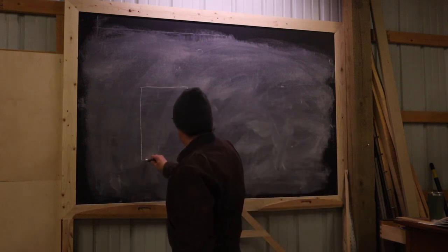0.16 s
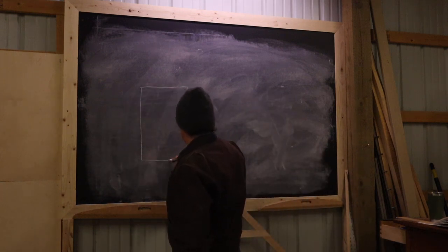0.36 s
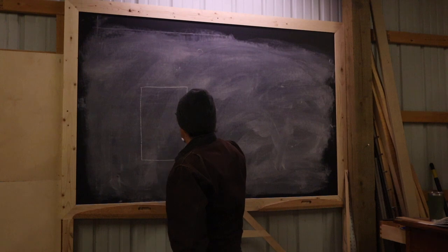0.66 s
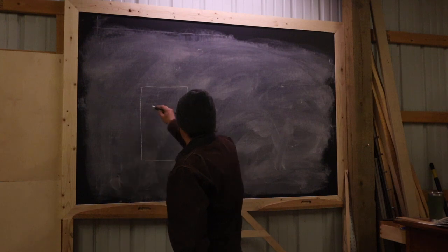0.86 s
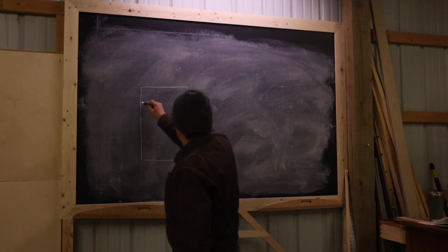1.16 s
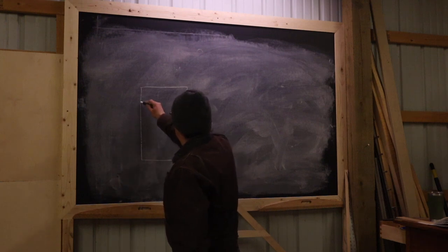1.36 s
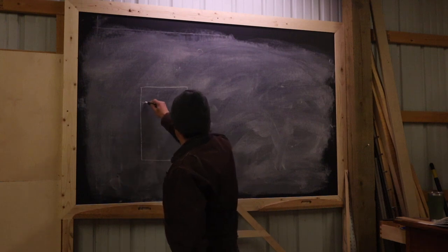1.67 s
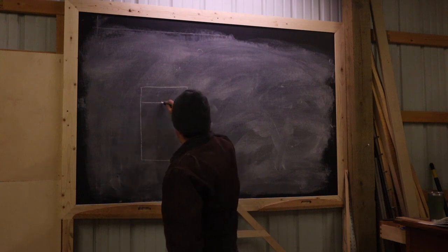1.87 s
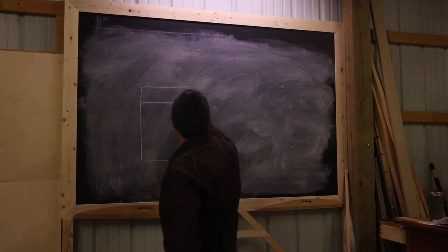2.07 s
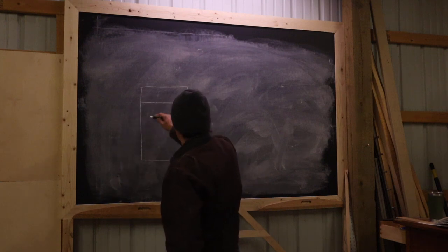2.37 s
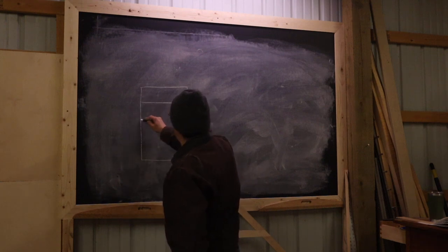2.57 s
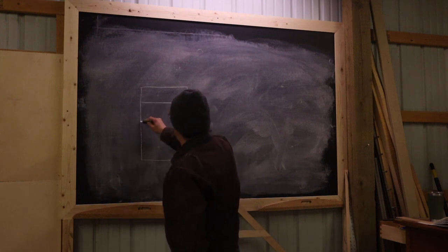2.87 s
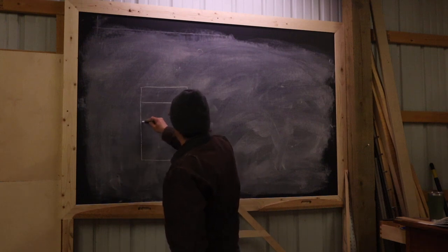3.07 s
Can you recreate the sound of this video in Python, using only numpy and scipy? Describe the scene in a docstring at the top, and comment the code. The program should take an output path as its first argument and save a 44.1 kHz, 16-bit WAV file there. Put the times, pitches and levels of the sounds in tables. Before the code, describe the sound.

Chalk taps a ringing chalkboard and rasps out lines over a faint room hum.

```python
"""Chalk on a large framed chalkboard in a workshop, one microphone a few metres off.
The board rings from a light tap, then an upward line scrapes along: crumbling grains hiss at the tip and
slips make the panel drone. The stick catches several times and the board sways with a low boom.
At 1.4 s the chalk lands with a knock and draws a level line, catching and chirping on a rough spot.
At 2.7 s it knocks again and another level line begins. The room hums quietly throughout."""
import sys
import numpy as np
from scipy import signal
from scipy.fft import rfft, irfft
from scipy.io import wavfile

SR = 44100
rng = np.random.default_rng(int(sys.argv[2]) if len(sys.argv) > 2 else 0)


def unload_audio(sound):
    """Save the sound as a 16-bit wav file, at the path given as the first command line argument."""
    columns = np.transpose(np.atleast_2d(sound))
    # keep every value between -1 and 1, then stretch to whole-number steps
    steps = np.round(np.clip(columns, -1, 1) * 32767)
    wavfile.write(sys.argv[1], SR, steps.astype(np.int16))


N = 141120
TIME = np.arange(N) / SR
CRUMBS, SLIPS = dict(per_s=9000, spread_db=4), dict(per_s=900, spread_db=-0.5)
# clear modes of the panel: f/Hz, level/dB, t60/s
PANEL_MODES = [(190.6, -2, 0.42), (239.7, -4, 1), (319, -3.5, 0.55), (405, 1, 0.2), (488, -5, 0.13),
               (533.7, -2, 0.21), (653, 1.5, 0.49), (720.5, -4, 0.75), (798, 4, 0.3), (891, -7.5, 0.79),
               (958, -7, 0.35), (1087, -8, 0.64), (1238, 3, 0.24), (1380, -7, 0.15), (1613, -22, 0.51),
               (1910, -20, 0.17), (2210, -13, .2)]
# resonances of the chalk tip: f/Hz, width/Hz, level/dB
TIP_RESONANCES = [(1875, 170, 1), (2996, 190, -2), (3265, 73, 2.5), (4420, 210, -3), (5740, 260, -5.5),
                  (6340, 400, -8), (7770, 220, -9.5), (10660, 250, -11.5)]


def chalk_lines():
    """One upward line, pressed harder and ringing hollow, then two level ones."""
    # course of the upward line: t/s, hiss/dB, rasp/dB, drone/dB
    upward = [(.13, -72, -82, -48), (.18, -63, -62, -58), (.235, -57, -55.5, -54), (.29, -56, -50, -41),
              (.38, -53.5, -47.5, -37), (.46, -61, -49, -39), (.58, -64, -48, -34), (.62, -69, -54, -36),
              (.67, -79, -59.5, -42.5), (0.788, -83, -71, -49.5), (.92, -69, -63.5, -55),
              (1.06, -80, -72, -71), (1.3, -80, -99, -83)]
    # course of each level line: t/s, hiss/dB, rasp/dB
    first_across = [(1.56, -78, -82), (1.584, -67, -58.5), (1.756, -55, -54), (1.864, -57, -56.5),
                    (1.92, -55, -47.5), (2.01, -60.5, -53), (2.138, -57, -53), (2.312, -75, -70),
                    (2.36, -93, -73)]
    second_across = [(3.0, -92, -82), (3.048, -75, -60.5), (3.194, -57, -51.5), (3.2, -57, -54)]
    # rasp spectra going up and going across: f/Hz, level/dB
    rasp_up = [(600, -4), (950, 3), (1120, 3), (1450, 3.5), (1800, 4), (2600, -1.5), (3100, -0.5),
               (3500, 2.5), (4000, -11), (4600, -7.5), (5300, -6), (6100, -16), (7000, -10), (9000, -22)]
    rasp_across = [(800, 10), (1500, 4.5), (1900, 12.5), (2650, -1), (3000, 6), (3300, 6.5), (3900, -3.5),
                   (4600, -3), (5500, 2.5), (6400, -10), (7000, -6.5), (9000, -43)]
    # hollow resonances woken by the upward line: f/Hz, width/Hz, level/dB
    hollow = [(982.5, 20, 0), (1097, 44, 0), (1123, 43, 0.5), (1244, 25, -13), (1830, 120, -11.5),
              (8340, 200, -22)]
    press_db, lean_db_per_s, mid_stroke_s = 2.5, 12.5, 0.35
    times, hiss_db, rasp_db, drone_db = np.transpose(upward)
    out = scrape(times, hiss_db, rasp_db + press_db, drone_db, rasp_up, tip_db=-11)
    out += stroke_gain(times, rasp_db + 2) * resonate(grains(**SLIPS), hollow)
    for course in (first_across, second_across):
        times, hiss_db, rasp_db = np.transpose(course)
        lean_db = lean_db_per_s * (times - times[0] - mid_stroke_s)   # the hand leans in as it moves
        drone_db = rasp_db + 9.5 + lean_db
        out += scrape(times, hiss_db, rasp_db, drone_db, rasp_across, tip_db=-4.5)
    return out


def scrape(times, hiss_db, rasp_db, drone_db, rasp_spectrum, tip_db):
    """Crumbling grains hiss and rasp at the tip; coarser slips drive the panel."""
    # spectra of the tip's hiss and the panel's drone: f/Hz, level/dB
    hiss_spectrum = [(5000, 3), (6800, -1.5), (7500, 2.5), (8100, -2), (8700, -5), (9500, 0), (10600, 1.5),
                     (11600, -0.5), (13000, 0.5), (14200, -11), (16000, -4)]
    drone_spectrum = [(60, -28), (120, 6), (190, 8), (280, 3.5), (450, 2.5), (750, -1.5), (950, -0.5),
                      (1130, 1), (1300, -5.5), (1480, -13), (2000, -16.5), (3000, -56)]
    crumbs, slips = reflections(grains(**CRUMBS)), grains(**SLIPS)
    ringing = rms_one(signal.fftconvolve(slips, panel_modes(TIME[:SR]))[:N])
    drone = colour(slips, drone_spectrum) + from_db(-8) * ringing
    tip_ring = resonate(reflections(grains(**CRUMBS)), TIP_RESONANCES)
    rasp = colour(crumbs + slips, rasp_spectrum) + from_db(tip_db) * tip_ring
    return (stroke_gain(times, hiss_db + 0.5) * colour(crumbs, hiss_spectrum)
            + stroke_gain(times, rasp_db - 1.5) * rasp
            + stroke_gain(times, drone_db - 2.5) * drone)


def grains(per_s, spread_db):
    """Chalk gives way in random clicks of uneven size."""
    clicks = rng.random(N) < per_s / SR
    sizes = from_db(spread_db * np.minimum(rng.exponential(1, N), 4))
    return clicks * sizes * rng.choice([-1, 1], N)


def taps():
    """Each landing sends a pulse and the stick's snap ahead of the board's ring; the spot colours it."""
    # landings: t/s, level/dB, treble cut/Hz, settling time/s, bass cut/Hz, node at this spot/Hz
    landings = [(-.02, -11, 7300, 0.00023, 200, 590), (1.4195, 0, 1640, 0.00023, 120, 720),
                (1.553, -12.5, 1190, 0.0059, 160, 725), (1.912, -11, 2040, .004, 160, 460),
                (2.6955, 0.5, 2320, 0.000055, 175, 2820), (2.865, -5.5, 1120, 0.003, 323, 1480)]
    pulse_s, snap_t60_s, node_depth = 0.0008, 0.072, 0.39
    t, out = TIME[:SR], 0
    pulse = from_db(-18) * 2 * np.sin(np.pi * np.sqrt(t / pulse_s)) * np.exp(-t / pulse_s / 2)
    for start_s, db, treble_hz, settle_s, bass_hz, node_hz in landings:
        snap = from_db(-23 - 60 * t / snap_t60_s) * highpass(rng.standard_normal(SR), hz=1760)
        blow = lowpass((pulse + snap + board_knock()) * (1 - np.exp(-t / settle_s)), treble_hz)
        blow -= node_depth * signal.lfilter(*signal.iirpeak(node_hz, Q=5.4, fs=SR), blow)
        out += place(from_db(db) * highpass(blow, bass_hz), start_s)
    return highpass(out, hz=142, order=4)   # a tapped panel gives little below its lowest mode


def board_knock():
    """Panel and room answer one blow: a fast early ring, a tail dying by band, and the clear modes."""
    # spectrum of the dense ringing: f/Hz, level/dB
    spectrum = [(60, -10), (115, 6), (175, -1.5), (350, 1), (550, 2.5), (800, -1.5), (1150, -1.5),
                (1600, -10.5), (2200, -14.5), (2700, -13.5), (3300, -9.5), (4100, -23), (5300, -11),
                (8000, -25), (15000, -23)]
    # decay of its tail: f/Hz, t60/s
    tail_t60 = [(120, 0.86), (320, 0.71), (840, 0.61), (2200, 0.54), (5800, 0.42), (14000, 0.54)]
    early_t60_s, build_s, spread_cycles = 0.24, 0.0024, 5.2
    t, out = TIME[:SR], 0
    edges_hz = 50 * 2 ** np.arange(0, 8.5, 1 / 3)
    white = rng.standard_normal((2, SR + SR // 4))
    for k, (low, high) in enumerate(zip(edges_hz, edges_hz[1:])):
        hz = np.sqrt(low * high)
        bandpass = signal.butter(2, [low, high], "band", fs=SR, output="sos")
        band = signal.sosfilt(bandpass, white[k % 2])[-SR:]
        fade = from_db(-60 * t / at_hz(tail_t60, hz)) + from_db(-1 - 60 * t / early_t60_s)
        fade *= 1 - 0.31 * np.exp(-t * hz / spread_cycles)   # low notes spread over the panel later
        band_rms = from_db(at_hz(spectrum, hz) - 13) * np.sqrt(np.mean(fade ** 2) * (high - low) / SR)
        out += band_rms * rms_one(band * fade)
    return (out + from_db(-39) * panel_modes(t)) * (1 - np.exp(-t / build_s))


def panel_modes(t, vary_db=2):
    """The panel's clear modes ring down, each struck with a random strength and sign."""
    out = 0
    for hz, db, t60 in PANEL_MODES:
        fade = from_db(db + vary_db * rng.normal() - 60 * t / t60)
        out += fade * np.sin(2 * np.pi * hz * t) * rng.choice([-1, 1])
    return out


def catches():
    """The stick catches: dull knocks mostly wake the lowest panel mode, damped by the pressing chalk."""
    # catches in mid-stroke: t/s, level/dB
    snags = [(.413, 2.5), (.434, 2.5), (.504, -15), (.556, 1.5), (.583, -5.5), (.61, -3), (1.915, 1.5)]
    t = TIME[:SR]
    hz, _, free_t60 = PANEL_MODES[0]
    thump = from_db(-33.5 - 60 * t / (free_t60 / 2)) * (1 - np.exp(-t * hz))
    groan = sum(place(from_db(db) * thump, s) for s, db in snags) * np.sin(2 * np.pi * hz * TIME)
    knocks = sum(place(from_db(db - 16.5) * lowpass(board_knock(), hz=980), s) for s, db in snags)
    return groan + knocks


def tip_chirp():
    """On a rough spot a brief burst of clicks rings the tip."""
    ring = highpass(resonate(grains(**CRUMBS), TIP_RESONANCES), hz=4300)
    return from_db(-33) * ring_down(start_s=1.906, rise_s=0.002, t60_s=0.094) * ring


def board_sway(hz=74):
    """The whole board booms in its frame during the upward line."""
    return from_db(-41) * ring_down(start_s=0.564, rise_s=0.014, t60_s=1.47) * np.sin(2 * np.pi * hz * TIME)


def reflections(x):
    """Frame, floor and walls ripple the spectrum of the scrape; its power stays the same."""
    # early echoes at the microphone: delay/s, level/dB
    echoes = [(.0013, -11), (.0031, -9), (.0058, -8), (.0093, -8), (.0141, -9), (.0207, -9), (.0293, -10),
              (.0411, -11)]
    delays, levels_db = np.transpose(echoes)
    gains = from_db(levels_db - 2)
    reflected = sum(gains[k] * (-1) ** k * place(x, s) for k, s in enumerate(delays))
    return (x + reflected) / np.sqrt(1 + np.sum(gains ** 2))


def room_tone():
    """The workshop's steady air, with faint whines and three hum tones, two of them wavering."""
    # spectrum of the air: f/Hz, level/dB
    air = [(25, -21), (40, -12), (56, -17), (76, -5), (100, -12.5), (125, -6), (160, -5.5), (205, -6.5),
           (280, -12), (400, -11.5), (450, -19.5), (550, -11.5), (720, -16.5), (900, -21.5), (1300, -27),
           (2000, -28), (3300, -30), (4500, -32), (15500, -35.5)]
    # thin whines: f/Hz, width/Hz, level/dB
    whines = [(3320, 120, -6), (14804, 44, -11)]
    # hum tones: f/Hz, level/dB, waver (0-1)
    hum = [(57.1, -60.5, 0), (161, -55, .15), (200.9, -57, 0.24)]
    out = from_db(-50) * colour(rng.standard_normal(N), air)
    out += from_db(-74) * resonate(rng.standard_normal(N), whines)
    for hz, db, waver in hum:
        swell, drift = (waver * rms_one(lowpass(rng.standard_normal(N), hz=5.1)) for _ in range(2))
        phase = 2 * np.pi * (hz * TIME + rng.random()) + 2 * drift
        out += from_db(db) * np.sqrt(2) * (1 + swell) * np.sin(phase)
    return out


def stroke_gain(times, db):
    """Gain along a stroke, silent outside it."""
    return from_db(np.interp(TIME, times, db, left=-120, right=-120))


def ring_down(start_s, rise_s, t60_s):
    """Envelope that rises quickly and dies away."""
    t = np.maximum(TIME - start_s, 0)
    return from_db(-60 * t / t60_s) * (1 - np.exp(-t / rise_s))


def resonate(x, resonances):
    """Parallel resonances of alternating sign; unit rms."""
    out = 0
    for k, (hz, width, db) in enumerate(resonances):
        ring = signal.lfilter(*signal.iirpeak(hz, hz / width, fs=SR), x)
        out += (-1) ** k * from_db(db) * rms_one(ring)
    return rms_one(out)


def colour(x, spectrum):
    """Give a steady sound a spectrum, rolling off past its ends; unit rms."""
    hz = np.arange(N // 2 + 1) * SR / N
    roll_off = np.minimum(1, hz / spectrum[0][0]) ** 2 * np.minimum(1, spectrum[-1][0] / (hz + 1)) ** 2
    return rms_one(irfft(rfft(x) * from_db(at_hz(spectrum, hz)) * roll_off, N))


def at_hz(points, hz):
    """Read a table on a log-frequency axis."""
    freqs, values = np.transpose(points)
    return np.interp(np.log(hz + 1e-9), np.log(freqs), values)


def lowpass(x, hz):
    """Two-pole treble cut."""
    return signal.sosfilt(signal.butter(2, hz, fs=SR, output="sos"), x + 1e-18)


def highpass(x, hz, order=2):
    """Bass cut."""
    return signal.sosfilt(signal.butter(order, hz, "high", fs=SR, output="sos"), x + 1e-18)


def place(x, start_s):
    """Start a sound at a given time."""
    return np.interp(np.arange(N) - round(start_s * SR), np.arange(len(x)), x, left=0, right=0)


def from_db(db):
    """Decibels to gain."""
    return 10 ** (np.asarray(db) / 20)


def rms_one(x):
    """Scale to unit rms."""
    return x / np.sqrt(np.mean(x ** 2) + 1e-20)


def scene():
    """Chalk, board and room at the microphone, in mono."""
    return (taps() + catches() + tip_chirp() + board_sway() + chalk_lines() + room_tone())[None]


def record(dry):
    """The top is cut steeply."""
    cutoff_hz = 15750
    return signal.sosfilt(signal.ellip(12, .1, 70, cutoff_hz, fs=SR, output="sos"), dry)


dry = scene()
out = record(dry)
unload_audio(out)
```